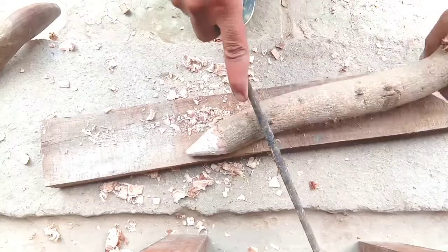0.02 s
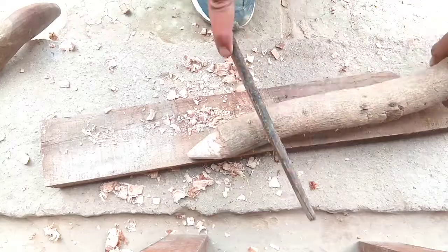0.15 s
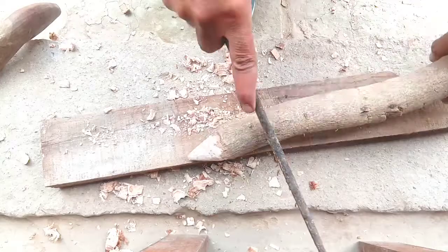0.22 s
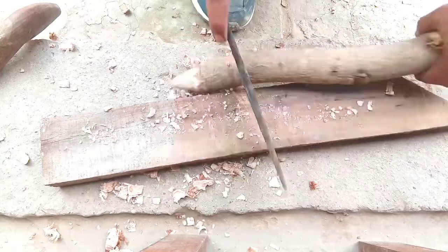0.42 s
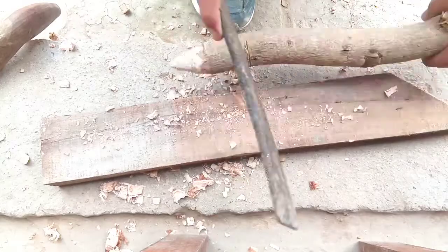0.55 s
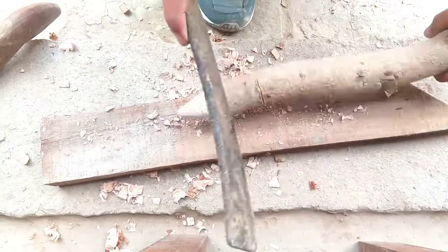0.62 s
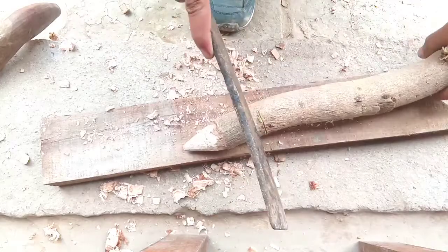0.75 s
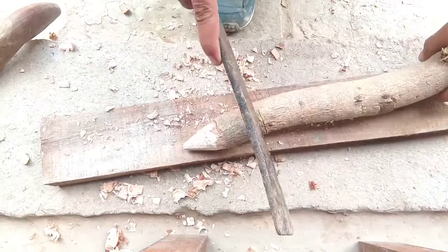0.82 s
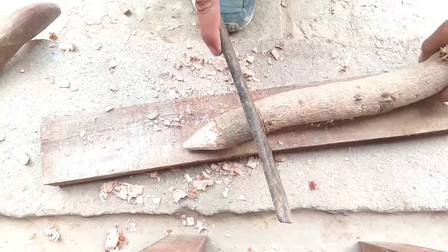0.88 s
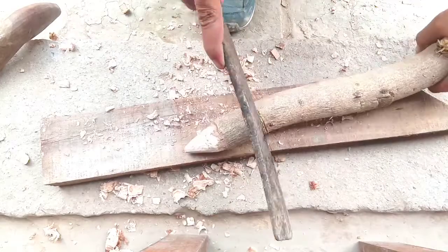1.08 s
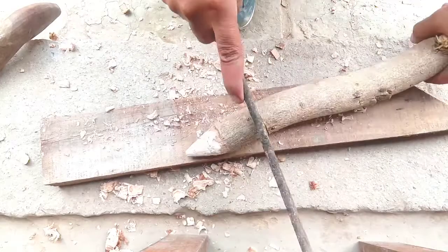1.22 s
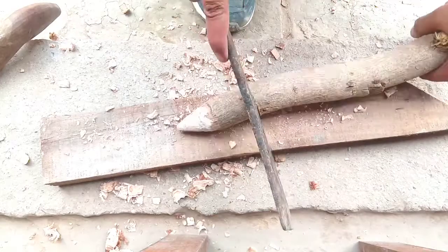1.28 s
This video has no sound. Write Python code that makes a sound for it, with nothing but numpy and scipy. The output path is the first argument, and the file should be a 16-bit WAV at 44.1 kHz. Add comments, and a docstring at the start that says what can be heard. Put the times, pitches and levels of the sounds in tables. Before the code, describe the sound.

Close scraping of a metal blade cutting wood, about five strokes a second. One brief squeak and a few rattling knocks against a plank interrupt it, then lighter cuts continue, with a slight echo from nearby walls.

```python
"""Shaving a wooden stick

A long steel blade cuts the end of a stick in quick hissing strokes, dragging lightly back between them.
Once it jams with a sharp squeak; the stick knocks and judders on the plank beneath it.
Nearby walls answer briefly over a low background rumble."""
import sys
import numpy as np
from scipy import signal
from scipy.fft import rfft, irfft, next_fast_len
from scipy.io import wavfile
from scipy.ndimage import map_coordinates

SR = 44100
rng = np.random.default_rng(int(sys.argv[2]) if len(sys.argv) > 2 else 0)


def int16_out(signal):
    """Quantize to a 16-bit WAV file."""
    q = np.round(np.clip(np.atleast_2d(signal).T, -1, 1) * 32767)
    wavfile.write(sys.argv[1], SR, q.astype(np.int16))


N = 59535


def amp(db):
    """Decibels to gain."""
    return 10 ** (np.asarray(db) / 20)


def unit_rms(x):
    """Scale to rms 1."""
    return x / np.sqrt(np.mean(x ** 2) + 1e-20)


def clock():
    """Sample times in seconds."""
    return np.arange(N) / SR


def along(points, hz):
    """Interpolate (Hz, value) points on a log frequency axis."""
    point_hz, values = np.transpose(points)
    return np.interp(np.log(hz + 1), np.log(point_hz + 1), values)


def filtered(x, response):
    """Apply a gain given as a function of Hz."""
    size = next_fast_len(N + SR // 2)
    return irfft(rfft(x, size) * response(np.fft.rfftfreq(size, 1 / SR)), size)[:N]


def wobble(rate_hz):
    """Smooth random curve, rate_hz knots a second."""
    return map_coordinates(rng.standard_normal(int(N * rate_hz / SR) + 4), [clock() * rate_hz])


def swell(centre_s, half_s):
    """Bell-shaped envelope."""
    return np.exp(-((clock() - centre_s) / half_s) ** 2)


def friction(spectrum, tilt_db_oct, snaps_per_s, snap_db, chatter_db, chatter_hz):
    """Wood fibres snap over a rubbing hiss that flutters as the edge catches. Tilt acts above 2 kHz."""
    snaps = (rng.random(N) < snaps_per_s / SR) * rng.standard_normal(N)
    force = rng.standard_normal(N) + amp(snap_db) * unit_rms(snaps)
    force *= amp(chatter_db * wobble(chatter_hz))

    def response(hz):
        treble_octaves = np.log2(np.maximum(hz, 2000) / 2000)
        return amp(along(spectrum, hz) + tilt_db_oct * treble_octaves)
    return unit_rms(filtered(force, response))


def ring(modes, start_s, tilt_db_oct, attack_s, jitter_rad):
    """Struck, damped modes with slightly unsteady phase."""
    age_s = np.maximum(clock() - start_s, 0)
    centre_hz = np.mean([mode[0] for mode in modes])
    out = np.zeros(N)
    for hz, db, t60_s in modes:
        level = amp(db + tilt_db_oct * np.log2(hz / centre_hz) - 60 * age_s / t60_s)
        out += level * np.sin(2 * np.pi * hz * age_s + jitter_rad * wobble(200))
    return out * (1 - np.exp(-age_s / attack_s))


# Cutting hiss. Each row: frequency in Hz, relative density in dB.
CUT_SPECTRUM = [(150, -37), (400, -9.5), (800, -7.5), (1300, -2.5), (2000, -3.5), (3000, -2), (4500, -2),
                (6500, 1.5), (8500, -4.5), (11000, -9.5), (15500, -9.5)]
# Cuts. Each row: start, attack and hold in seconds, fade in dB/s, level in dB,
# treble tilt in dB/octave, lift-off time in seconds.
STROKES = [(-.02, .01, 0.024, 355, -35.5, -2, 0.052), (0.194, 0.0062, 0.019, 370, -32.5, 1.5, 0.27),
           (0.397, .02, 0.022, 500, -31, -2, 0.4335), (0.58, 0.056, 0.049, 196, -35.5, 2, 0.69),
           (0.828, 0.055, .016, 297.5, -38, 2.5, .955), (1.011, 0.016, 0.037, 260, -39, 2.5, 1.1),
           (1.17, 0.021, 0.027, 386, -38, 2.5, 1.367)]


def strokes(bite_exponent=0.74, lift_edge_s=0.0081):
    """The edge bites quickly, builds pressure more slowly, holds and fades until it lifts off."""
    t, out = clock(), np.zeros(N)
    for start_s, attack_s, hold_s, fade_db_per_s, db, tilt_db_oct, lift_s in STROKES:
        bite = np.clip((t - start_s) / attack_s, 0, 1) ** bite_exponent
        level = amp(db - fade_db_per_s * np.maximum(t - start_s - attack_s - hold_s, 0))
        contact = (1 - np.tanh((t - lift_s) / lift_edge_s)) / 2
        hiss = friction(CUT_SPECTRUM, tilt_db_oct, snaps_per_s=1500, snap_db=-4.5,
                        chatter_db=0.87, chatter_hz=260)
        out += bite * level * contact * hiss
    return out


# Light rub. Each row: frequency in Hz, relative density in dB.
DRAG_SPECTRUM = [(150, 3), (350, 4.5), (800, -8.5), (1400, -1), (2800, -4.5), (4500, -3.5), (6300, -3.5),
                 (8500, -16.5), (15500, -35.5)]
# Drags. Each row: start and length in seconds, level in dB, treble tilt in dB/octave.
DRAGS = [(0.042, 0.13, -51.5, -4.5), (0.131, 0.018, -46, 2), (0.154, 0.019, -40.5, 10),
         (0.179, 0.013, -41, -8.5), (0.228, 0.078, -47.5, -1), (0.323, 0.041, -44, -2.5),
         (0.374, 0.073, -51, 0.5), (0.438, 0.062, -58.5, 11), (0.554, 0.024, -43, -4.5),
         (0.695, 0.045, -55.5, 4), (.742, 0.035, -52.5, 8.5), (0.766, 0.061, -62, 8.5),
         (0.952, 0.059, -56, -4), (1.109, 0.036, -59.5, 4.5), (1.236, .12, -48, 2)]


def drags(edge_s=0.0026):
    """The blade slides back with little pressure: a duller, weaker rub."""
    t, out = clock(), np.zeros(N)
    for start_s, length_s, db, tilt_db_oct in DRAGS:
        contact = (np.tanh((t - start_s) / edge_s) - np.tanh((t - start_s - length_s) / edge_s)) / 2
        rub = friction(DRAG_SPECTRUM, tilt_db_oct, snaps_per_s=540, snap_db=-7,
                       chatter_db=1.5, chatter_hz=140)
        out += amp(db) * contact * rub
    return out


# Squeak partials. Each row: ratio to base pitch, relative level in dB.
SQUEAK_PARTIALS = [(0.99, 0.5), (0.622, -11), (.268, -19.5)]
# Squeaks. Each row: centre and half-length in seconds, level in dB, base pitch in Hz.
SQUEAKS = [(0.332, 0.013, -46, 2170), (0.35, 0.011, -40, 2183), (0.392, 0.0044, -36.5, 2230),
           (0.4036, 0.0034, -19, 2060), (0.4385, 0.0018, -7.5, 2045), (0.4424, 0.0012, -18, 2020),
           (.466, 0.0055, -26.5, 2185)]


def squeaks(jitter_rad=0.9):
    """The jammed edge sticks and slips unevenly."""
    t, out = clock(), np.zeros(N)
    for centre_s, half_s, db, hz in SQUEAKS:
        for ratio, partial_db in SQUEAK_PARTIALS:
            phase = 2 * np.pi * hz * ratio * (t - centre_s) + jitter_rad * wobble(400)
            out += amp(db + partial_db) * swell(centre_s, half_s) * np.cos(phase)
    return out


# Plank and stick modes. Each row: frequency in Hz, relative level in dB, T60 in seconds.
PLANK_MODES = [(321.7, -0.5, 0.066), (448, 4, 0.027), (650, 0, 0.057)]
STICK_MODES = [(929, -0.5, 0.019), (1193, -0.5, 0.049), (1403, -0.5, 0.022), (1762, -3, 0.02),
               (2071, -8.5, 0.038), (2430, -7.5, 0.016)]
# Knocks. Each row: start in seconds, plank level in dB, most excited plank pitch in Hz,
# stick level in dB, stick tilt in dB/octave.
KNOCKS = [(0, -44, 397, -36.5, 0), (.158, -37, 450, -38, 2), (.168, -30.5, 427, -48, -10),
          (0.209, -56, 400, -37.5, 2), (0.282, -43.5, 316, -41, 1), (.326, -42, 440, -41, -6),
          (0.399, -25, 650, -34, 1), (0.435, -27, 470, -17, 1.5), (0.456, -35.5, 500, -26, -2),
          (.557, -28.5, 373, -35.5, -4), (.5615, -26.5, 650, -59, 14), (.567, -25.5, 646, -34, -8),
          (.657, -31.5, 495, -25, 7), (.669, -34.5, 333, -42, -11.5), (.677, -20, 314, -28.5, -1),
          (1.044, -39, 304, -52, -13), (1.266, -51, 450, -35, 9.5), (1.275, -40, 407, -32, 8),
          (1.332, -43, 447, -41, 5)]


def knocks(falloff_db_oct=13.5):
    """Each contact rings plank and stick; the spot hit favours plank modes near one pitch."""
    out = np.zeros(N)
    for start_s, plank_db, spot_hz, stick_db, tilt_db_oct in KNOCKS:
        excited = [(hz, db - falloff_db_oct * abs(np.log2(hz / spot_hz)), t60_s)
                   for hz, db, t60_s in PLANK_MODES]
        out += amp(plank_db) * ring(excited, start_s, 0, attack_s=0.0013, jitter_rad=0.47)
        out += amp(stick_db) * ring(STICK_MODES, start_s, tilt_db_oct, attack_s=0.00042, jitter_rad=0.98)
    return out


# Modes of the plank on the ground. Each row: frequency in Hz, relative level in dB, T60 in seconds.
THUMP_MODES = [(63, -13, 0.093), (132.3, 1, 0.17), (204.7, -6.5, 0.11)]
# Thumps. Each row: start in seconds, level in dB.
THUMPS = [(0.131, -36.5), (0.28, -38.5), (0.4, -29), (0.437, -26.5), (.471, -25), (0.546, -47),
          (1.288, -40.5)]


def thumps():
    """The plank is pressed on the ground and booms softly."""
    return sum(amp(db) * ring(THUMP_MODES, start_s, 0, attack_s=0.0021, jitter_rad=0.43)
               for start_s, db in THUMPS)


# Wooden rattle. Each row: frequency in Hz, relative density in dB.
JUDDER_SPECTRUM = [(150, -18), (400, -2.5), (700, -6), (930, 0), (1400, 0), (1700, -2.5), (2000, -3.5),
                   (2350, -0.5), (2650, -13.5), (4000, -22.5), (15000, -55)]
# Judders. Each row: centre and half-length in seconds, level in dB.
JUDDERS = [(0.404, 0.011, -35.5), (0.47, 0.023, -30.5), (0.687, .022, -34.5)]


def judders():
    """After hard knocks the stick rattles over the plank in many tiny contacts."""
    level = sum(amp(db) * swell(centre_s, half_s) for centre_s, half_s, db in JUDDERS)
    return level * friction(JUDDER_SPECTRUM, 0, snaps_per_s=830, snap_db=1, chatter_db=3, chatter_hz=200)


# Swells of the blade tone. Each row: centre and half-length in seconds, level in dB.
BLADE_SWELLS = [(0.331, 0.0043, -42), (0.35, .007, -34.5), (0.568, 0.0064, -36.5), (0.86, 0.047, -53.5),
                (.916, .011, -40.5), (0.938, 0.0058, -44.5), (0.975, 0.022, -54), (1.342, 0.0095, -47.5)]


def blade_tone(mode_hz=1151, flutter_db=3.0, jitter_rad=0.75):
    """Rubbing keeps one blade mode ringing, fluttering in level and phase."""
    level = sum(amp(db) * swell(centre_s, half_s) for centre_s, half_s, db in BLADE_SWELLS)
    flutter = amp(flutter_db * wobble(140))
    return level * flutter * np.sin(2 * np.pi * mode_hz * clock() + jitter_rad * wobble(110))


# Whistles. Each row: centre and half-length in seconds, level in dB, pitch in Hz, glide in octaves/s.
WHISTLES = [(0.052, 0.0023, -40.5, 7040, -3.5), (0.05, .003, -46.5, 3970, -1), (0.178, .008, -46, 6250, -2),
            (0.2374, 0.0034, -32, 6100, -2.5), (0.84, 0.0059, -45.5, 11100, -2.5),
            (1.247, 0.022, -43.5, 3370, -10)]


def whistles(jitter_rad=1.1):
    """The edge whistles for an instant on hard fibres."""
    t, out = clock(), np.zeros(N)
    for centre_s, half_s, db, hz, glide_oct_per_s in WHISTLES:
        pitch_hz = hz * 2 ** np.clip(glide_oct_per_s * (t - centre_s), -1, 1)
        phase = 2 * np.pi * np.cumsum(pitch_hz) / SR + jitter_rad * wobble(500)
        out += amp(db) * swell(centre_s, half_s) * np.sin(phase)
    return out


# Wall echoes. Each row: delay in seconds, gain in dB.
ECHOES = [(.0053, -16.5), (0.01, -19)]
# Tail decay. Each row: frequency in Hz, T60 in seconds.
TAIL_T60 = [(150, .2), (320, 0.21), (1000, 0.2), (2200, 0.16), (5000, 0.13), (14000, 0.11)]


def walls(x, tail_db, build_s):
    """Nearby walls add two early echoes and a short diffuse tail."""
    hz, t, noise = signal.stft(rng.standard_normal(SR // 2), SR, nperseg=256)
    decay = amp(-60 * t / along(TAIL_T60, hz)[:, None])
    build = 1 - np.exp(-t / build_s)
    impulse = signal.istft(noise * decay * build, SR, nperseg=256)[1]
    tail = signal.fftconvolve(x, impulse / np.linalg.norm(impulse))[:N]
    early = filtered(x, lambda f: sum(amp(db) * np.exp(-2j * np.pi * f * delay_s)
                                      for delay_s, db in ECHOES))
    return x + early + amp(tail_db) * tail


# Rumble colour. Each row: frequency in Hz, relative density in dB.
RUMBLE_SPECTRUM = [(20, -23), (55, -11.5), (90, -5), (125, 0), (180, -9.5), (260, -19), (600, -25),
                   (1400, -26.5), (2800, -37), (6000, -34), (15500, -47)]
# Rumble envelope. Each row: time in seconds, level in dB.
RUMBLE_LEVEL = [(0, -47.5), (.3, -48), (.55, -47.5), (.64, -52), (.78, -50.5), (.81, -50), (.92, -50),
                (1.08, -48), (1.15, -49.5), (1.22, -47.5), (1.35, -47)]


def rumble():
    """Low background noise, drifting in level."""
    level = amp(np.interp(clock(), *np.transpose(RUMBLE_LEVEL)))
    noise = filtered(rng.standard_normal(N), lambda hz: amp(along(RUMBLE_SPECTRUM, hz)))
    return level * unit_rms(noise)


def scene():
    """Mono mix: rubs and contacts echo off the walls; thumps and rumble stay dry."""
    rubs = walls(strokes() + drags() + whistles(), tail_db=-14.5, build_s=0.014)
    contacts = walls(squeaks() + knocks() + judders() + blade_tone(), tail_db=-13, build_s=0.013)
    return (rubs + contacts + thumps() + rumble())[None]


def record(dry):
    """Brick-wall low-pass at 15.8 kHz."""
    return filtered(dry[0], lambda hz: hz < 15800)[None]


dry = scene()
out = record(dry)
int16_out(out)
```